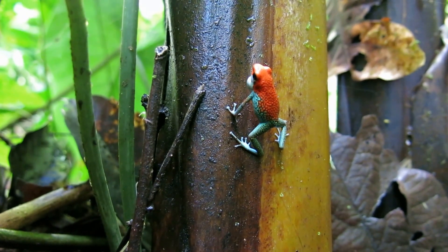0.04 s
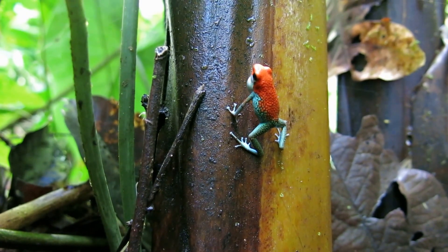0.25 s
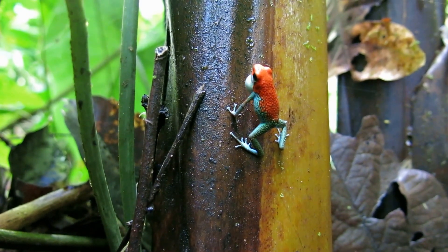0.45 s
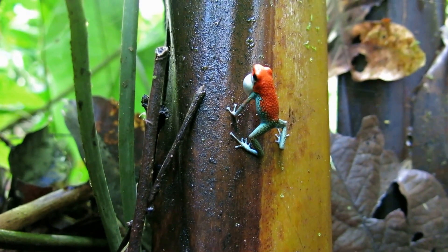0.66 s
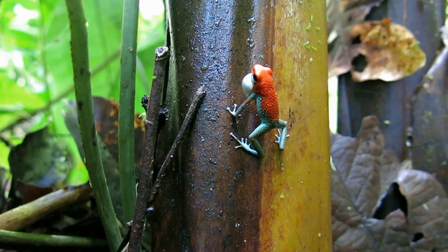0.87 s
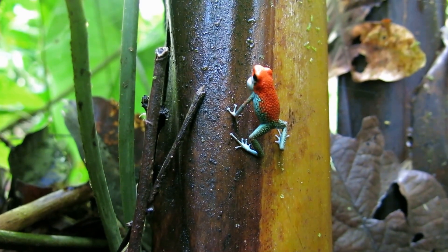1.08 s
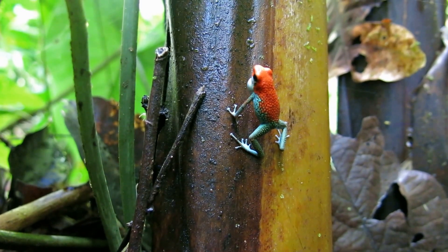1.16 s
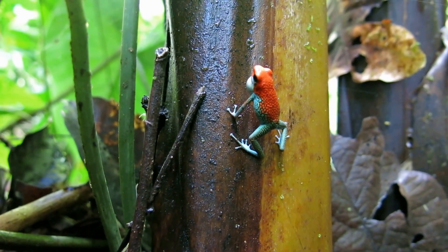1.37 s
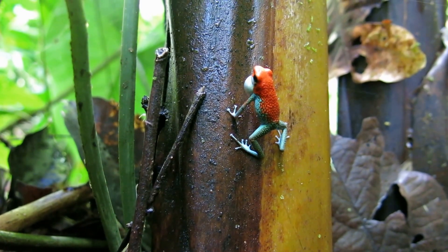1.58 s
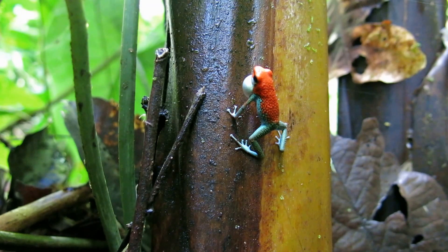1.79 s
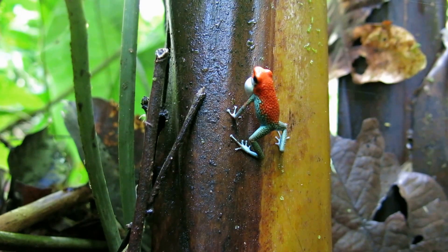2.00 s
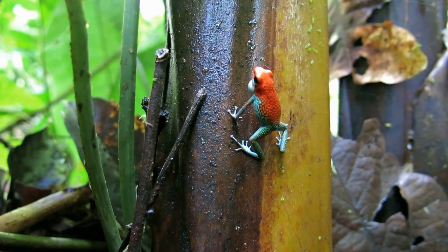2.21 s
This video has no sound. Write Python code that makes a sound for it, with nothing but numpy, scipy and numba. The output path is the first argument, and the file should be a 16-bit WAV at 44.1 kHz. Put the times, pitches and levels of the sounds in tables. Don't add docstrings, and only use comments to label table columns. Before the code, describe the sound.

Two shrill rattling frog calls swell close by, a short gap between them, above soft rushing water.

```python
import sys
import numpy as np
from scipy import signal
from scipy.fft import rfft, irfft
from scipy.io import wavfile
from scipy.ndimage import uniform_filter1d
from numba import njit

SR = 44100
rng = np.random.default_rng(int(sys.argv[2]) if len(sys.argv) > 2 else 0)


def undo_db(level):
    steps = np.asarray(level, float) / 20
    return 10 ** steps


def materialize(psi):
    bounded = np.clip(np.atleast_2d(psi).T, -1, 1)
    quanta = np.round(bounded * 32767).astype(np.int16)
    wavfile.write(sys.argv[1], SR, quanta)


N = 99225

# (frequency [Hz], density [dB per Hz])
WASH = [(22, -46), (115, -5), (300, -4), (520, -2), (950, -7), (2000, -10), (3050, -18), (15500, -26.5)]
# (time [s], level [dB])
SURGE = [(0, 0), (.2, 1), (.5, 3.5), (.62, 1.5), (.85, -1.9), (1.15, 0.5), (1.3, 1.1), (1.55, 3.5),
         (1.7, -0.9), (2, -1.2), (2.25, 0.8)]
# (frequency [Hz], share [1])
SURGE_SHARE = [(100, 0.99), (600, 0.58), (1800, 0.78), (4000, 0.66), (13000, .6)]
# (frequency [Hz], likeness [0-1])
LIKENESS = [(30, 0.41), (100, 0.97), (300, 0.95), (700, 0.79), (1650, 0.54), (5000, 0.46), (12000, 0.022)]
# (frequency [Hz], left over right [dB])
BALANCE = [(60, 0.5), (150, 0.2), (380, 1.2), (950, 1.7), (2380, 1.2), (5980, -1.0), (15000, -0.78)]
# (frequency [Hz], lead [rad])
LEFT_LEAD = [(60, -0.22), (860, -0.15), (1640, -0.033), (3800, 0.012), (7400, 0.48)]
# (delay [s], left level [dB], right level [dB])
LEAF_ECHOES = [
    (.0021, -31.5, -31),
    (.0046, -20.5, -13),
    (.0073, -27, -30),
]
# (time [s], rate [snaps/s])
TRILL_RATES = [
    [(.2628, 101.4), (.2825, 128.7), (.3705, 159.6), (.4345, 148.8), (.5515, 177.9), (.6205, 157.4),
     (.7577, 143.2), (.8382, 101.8), (.8585, 191.3)],
    [(1.3086, 102.3), (1.3236, 102), (1.3865, 149.6), (1.4878, 148.7), (1.4906, 156.6), (1.5946, 171.6),
     (1.8224, 133.9), (1.8924, 101.1), (1.9109, 211.8)],
]
LONE_SNAPS = [
    0.2075,
    0.2328,
    .2512,
    0.8615,
    1.255,
    1.2772,
    1.297,
    1.914,
]
# (time [s], snap strength [dB], sac pitch [Hz], sac damping [Hz])
EFFORT = [
    [(.2, -19, 3370, 430), (.3, -15, 3430, 396), (.45, -7.5, 3630, 315), (.56, -5.5, 3875, 216),
     (.7, -5.5, 4075, 230), (.82, -6, 4240, 268), (.847, -7.5, 4200, 330), (.866, -16.5, 4160, 500)],
    [(1.25, -17.5, 3370, 430), (1.35, -13, 3490, 390), (1.5, -7, 3720, 300), (1.6, -5.5, 3880, 217),
     (1.75, -5.5, 4120, 236), (1.88, -6, 4270, 300), (1.9, -7.5, 4130, 378), (1.916, -17.5, 4230, 500)],
]
# (rest pitch [Hz], share of sac's rise [1], width [Hz], level re sac [dB], left-right [dB])
BODY_RINGS = [
    (3686, -0.074, 1180, -9, 16.5),
    (3183, 0.14, 560, -14, -16),
    (4450, 0.067, 1400, -27, 7),
]

WASH_DB, PATCH_DB, FLICKER_DB = -28, 0.5, 0.29
HISS_HZ, HISS_DB = 5560, 2
FOREST_T60_S, FOREST_DB = .045, -17
FROG_DB, SNAP_SPREAD_DB, BODY_SPREAD_DB = 4.5, .6, 1.3
SNAP_JITTER_S, SNAP_LEAD_S = 5e-5, .0002
REST_HZ, SAC_WAVER = 3500, 0.003
SAC_PAN_DB, SAC_LAG_S = 2.5, 1.8e-5
SKULL_HZ, SKULL_WIDTH_HZ, SKULL_DB = 5650, 350, -27
SOFT_HZ, SHARP_FROM_DB, SHARP_SPAN_DB = 5760, -11, 6
BODY_LOW_HZ, BODY_HIGH_HZ = 2900, 8900
OVER_HZ, OVER_FOLLOW, OVER_RISE_HZ, OVER_WIDTH_HZ = 9520, 3.1, 1400, 570
OVER_DB, OVER_PAN_DB, OVER_DB_SHARE = -32.5, -8, .5
EDGE_HZ = 15800


def evened(x):
    return x / np.sqrt(np.mean(x ** 2) + 1e-20)


def read(points, hz):
    f, value = np.transpose(points)
    return np.interp(np.log(hz + 1), np.log(f + 1), value)


def stream():
    frames, hz = N // 256 + 5, np.fft.rfftfreq(1024, 1 / SR)
    a, b, c, d, grain = rng.standard_normal((frames, 513, 5)).T
    flicker = evened(uniform_filter1d(grain, size=150, axis=0))
    patches = uniform_filter1d(grain, size=12, axis=0)
    patches = evened(uniform_filter1d(patches, size=14, axis=1))
    surge = np.interp(np.arange(frames) * 256 / SR, *np.transpose(SURGE))

    likeness = np.clip(read(LIKENESS, hz), -1, 1)[:, None]
    left = a + 1j * b
    shared = likeness * left * np.exp(-1j * read(LEFT_LEAD, hz))[:, None]
    right = shared + np.sqrt(1 - likeness ** 2) * (c + 1j * d)
    balance = undo_db(read(BALANCE, hz) / 2)[:, None]
    spectra = np.array([left * balance, right / balance])

    hiss = HISS_DB * np.exp(-np.log((hz + 1) / HISS_HZ) ** 2 / 0.35)
    level_db = (read(WASH, hz) + hiss)[:, None]
    level_db = level_db + PATCH_DB * patches + FLICKER_DB * flicker
    level_db = level_db + read(SURGE_SHARE, hz)[:, None] * surge
    spectra *= undo_db(level_db)
    water = signal.istft(spectra, nperseg=1024, noverlap=768)[1][:, :N]
    return undo_db(WASH_DB) * evened(water)


def forest(x):
    length = SR // 4
    taps = np.zeros((2, length))
    at = np.arange(60, length - 20, 20) + rng.integers(0, 20, (2, (length - 61) // 20))
    np.put_along_axis(taps, at, rng.choice([-1., 1.], at.shape), 1)
    taps *= undo_db(-60 * np.arange(length) / SR / FOREST_T60_S)
    taps *= undo_db(FOREST_DB) / np.linalg.norm(taps[0])
    taps[:, 0] = 1
    for delay_s, left_db, right_db in LEAF_ECHOES:
        taps[:, round(delay_s * SR)] += undo_db(np.array([left_db, right_db]))
    return signal.fftconvolve(x, taps, axes=1)[:, :N]


@njit
def smooth(x, r):
    y = np.zeros_like(x)
    for i in range(1, len(x)):
        y[i] = r[i] * y[i - 1] + (1 - r[i]) * x[i]
    return y


def resonate(x, hz, width):
    one = np.ones(N)
    turn = np.exp(2j * np.pi * np.cumsum(hz * one) / SR)
    memory = np.exp(-np.pi * width * one / SR)
    return 2 * (turn * smooth(x / turn, memory)).real


def ring(snaps, hz, width):
    return resonate(snaps, hz, width) * SR / (2 * np.pi * width)


def delayed(x, s):
    return irfft(rfft(x) * np.exp(-2j * np.pi * np.fft.rfftfreq(N, 1 / SR) * s), N)


def panned(x, pan_db):
    return x * undo_db(np.array([[.5], [-.5]]) * pan_db)


def snap_times():
    times = [np.array(LONE_SNAPS)]
    for rows in TRILL_RATES:
        s, rate = np.transpose(rows)
        t = np.arange(s[0], s[-1] + .001, 1 / SR)
        turns = np.cumsum(np.interp(t, s, rate)) / SR
        times.append(np.interp(np.arange(int(turns[-1]) + 1), turns, t))
    return np.sort(np.concatenate(times))


def vocal_sac(snaps, hz, damping_hz):
    sac = ring(snaps, hz, damping_hz)
    return panned(np.array([sac, delayed(sac, SAC_LAG_S)]), SAC_PAN_DB)


def throat_and_body(snaps, rise):
    skull = resonate(ring(snaps, SKULL_HZ, SKULL_WIDTH_HZ), SKULL_HZ, 2 * SKULL_WIDTH_HZ)
    out = undo_db(SKULL_DB) * skull
    for rest_hz, share, width, level_db, pan_db in BODY_RINGS:
        out = out + panned(undo_db(level_db) * ring(snaps, rest_hz + share * rise, width), pan_db)
    return out


def sac_overtone(snaps, rise):
    hz = OVER_HZ + OVER_RISE_HZ * np.tanh(OVER_FOLLOW * rise / OVER_RISE_HZ)
    over = resonate(ring(snaps ** OVER_DB_SHARE, hz, OVER_WIDTH_HZ), hz, 2 * OVER_WIDTH_HZ)
    return panned(undo_db(OVER_DB) * over, OVER_PAN_DB)


def frog():
    s, strength_db, pitch_hz, damping_hz = np.transpose(EFFORT[0] + EFFORT[1])
    clock = np.arange(N) / SR
    times = snap_times()
    jitter, spread, waver, body_spread = rng.standard_normal((4, len(times)))
    at = ((times - SNAP_LEAD_S + SNAP_JITTER_S * jitter) * SR).astype(int)
    snaps = np.zeros(N)
    snaps[at] = undo_db(np.interp(times, s, strength_db) + SNAP_SPREAD_DB * spread + FROG_DB)

    sac_hz = np.interp(clock, s, pitch_hz)
    rise = sac_hz - REST_HZ
    wavering_hz = sac_hz * (1 + SAC_WAVER * np.interp(np.arange(N), at, waver))
    body_snaps = snaps * undo_db(BODY_SPREAD_DB * np.interp(np.arange(N), at, body_spread))
    sac = vocal_sac(snaps, wavering_hz, np.interp(clock, s, damping_hz))
    voice = sac - throat_and_body(body_snaps, rise)

    soft = signal.sosfilt(signal.butter(2, SOFT_HZ, fs=SR, output="sos"), voice)
    sharp = np.clip((np.interp(clock, s, strength_db) - SHARP_FROM_DB) / SHARP_SPAN_DB, 0, 1)
    voice = soft + sharp * (voice - soft)
    band = signal.butter(4, [BODY_LOW_HZ, BODY_HIGH_HZ], "band", fs=SR, output="sos")
    return signal.sosfilt(band, voice) + sac_overtone(snaps, rise)


def scene():
    return forest(frog()) + stream()


def band_limit(x):
    return signal.sosfilt(signal.butter(12, 15690, fs=SR, output="sos"), x)


def record(dry):
    edge = signal.firwin(511, EDGE_HZ, window=("kaiser", 9), fs=SR)[None]
    mix = signal.oaconvolve(dry, edge, "same")
    return band_limit(mix)


dry = scene()
out = record(dry)
materialize(out)
```